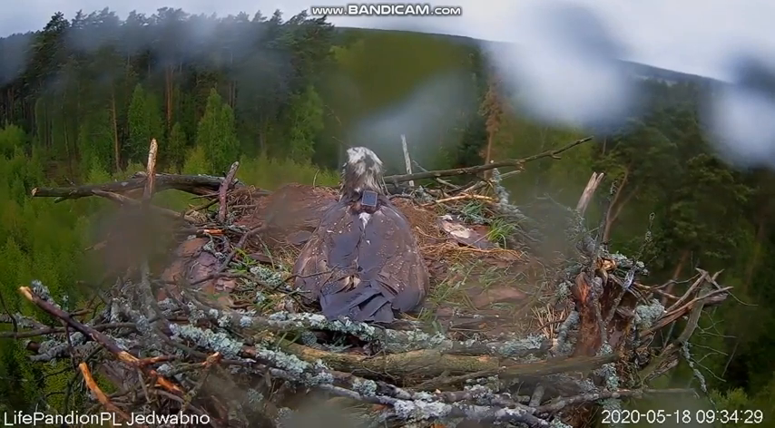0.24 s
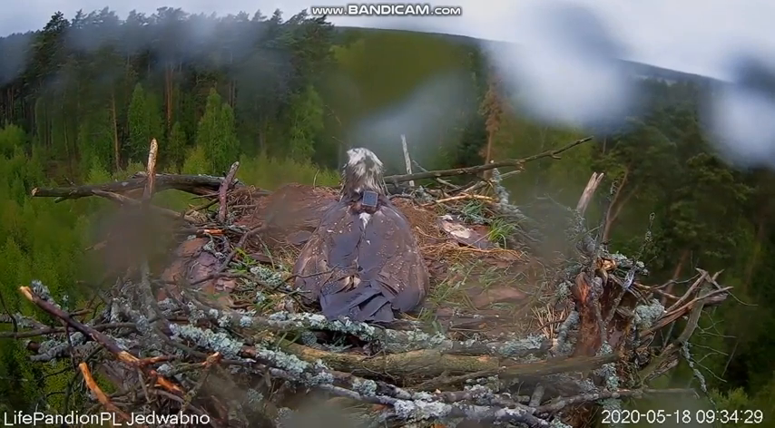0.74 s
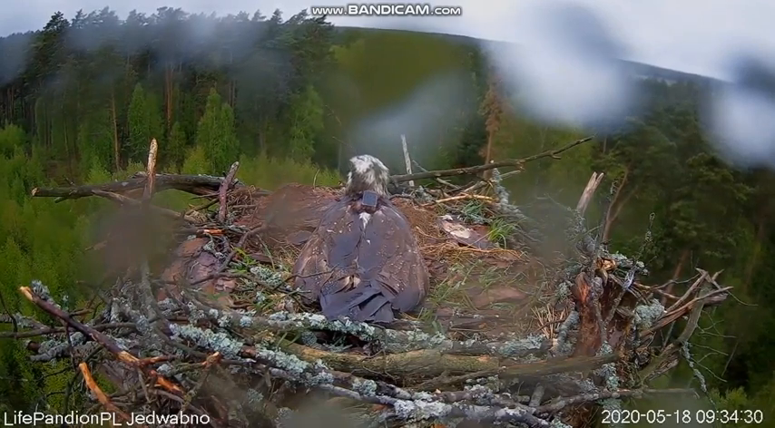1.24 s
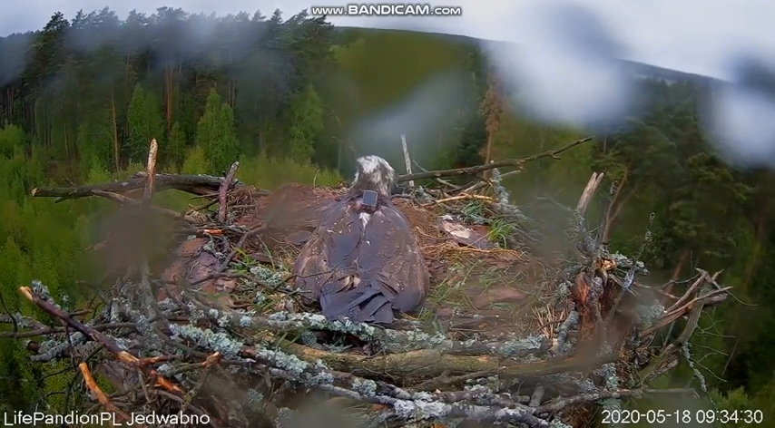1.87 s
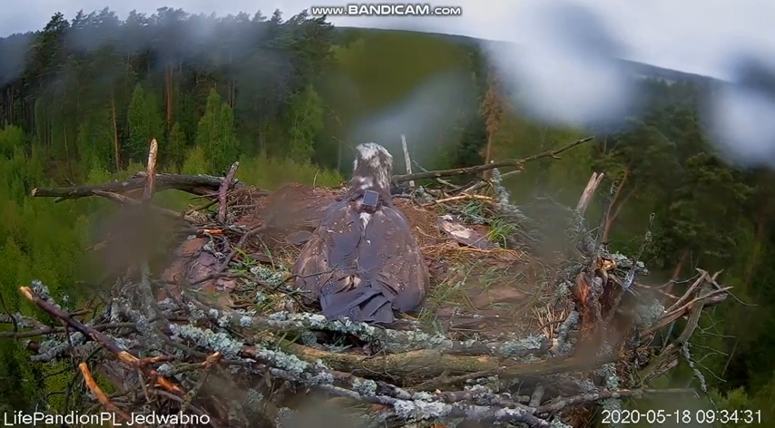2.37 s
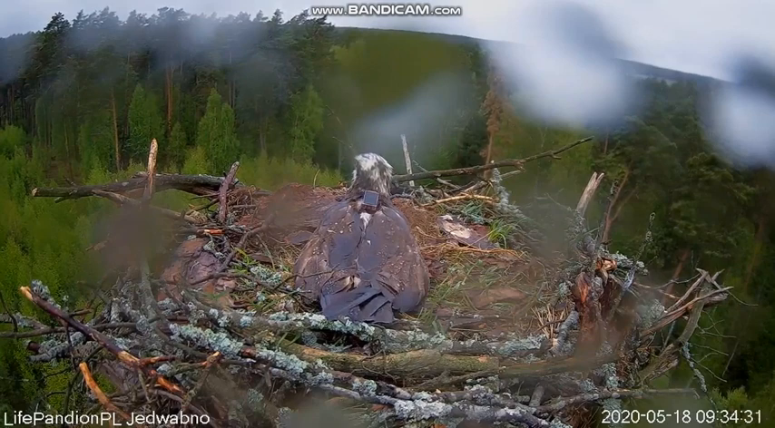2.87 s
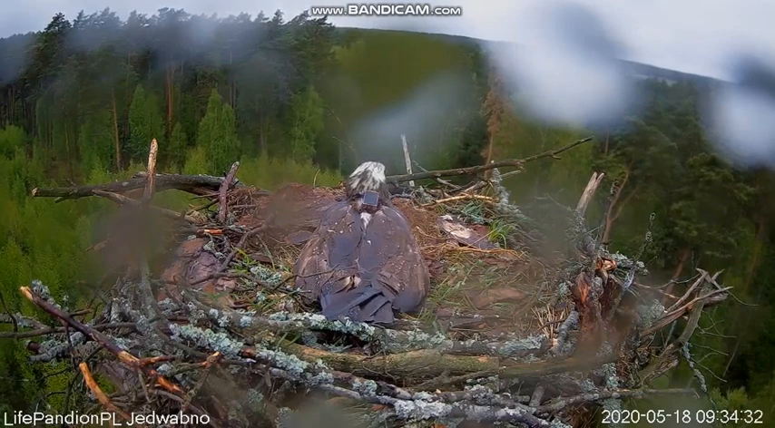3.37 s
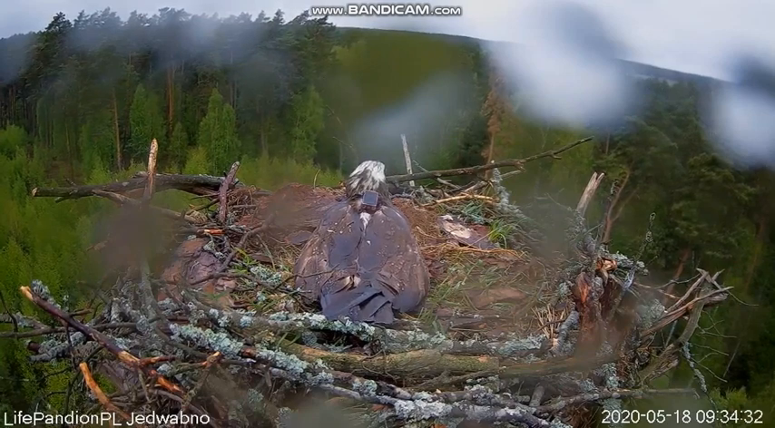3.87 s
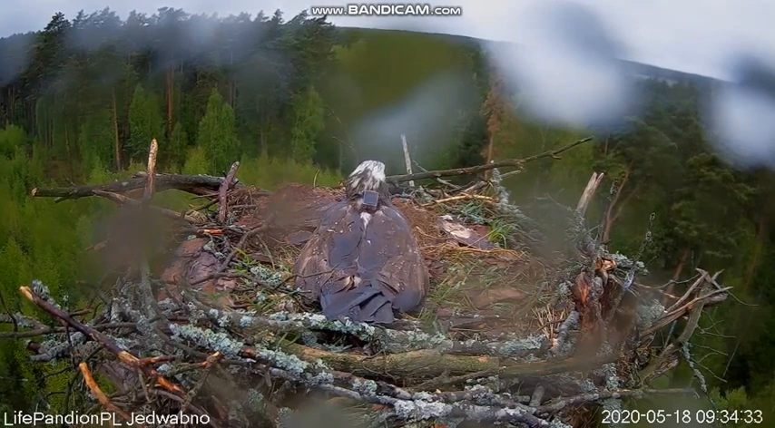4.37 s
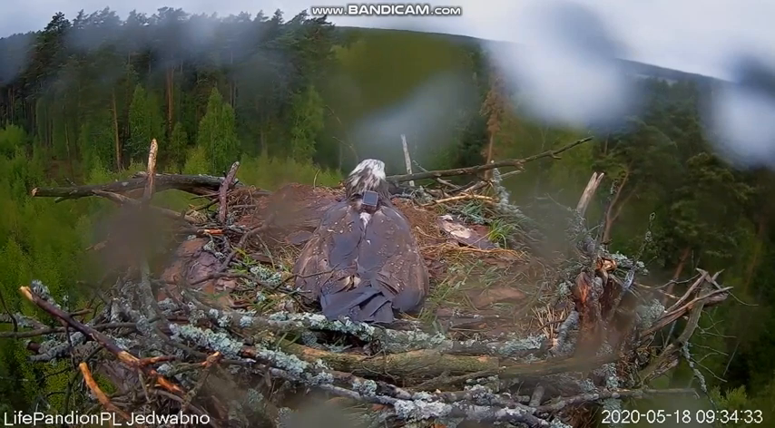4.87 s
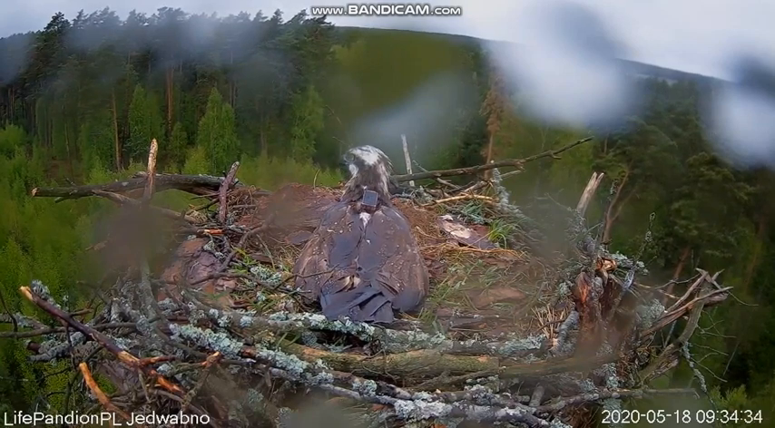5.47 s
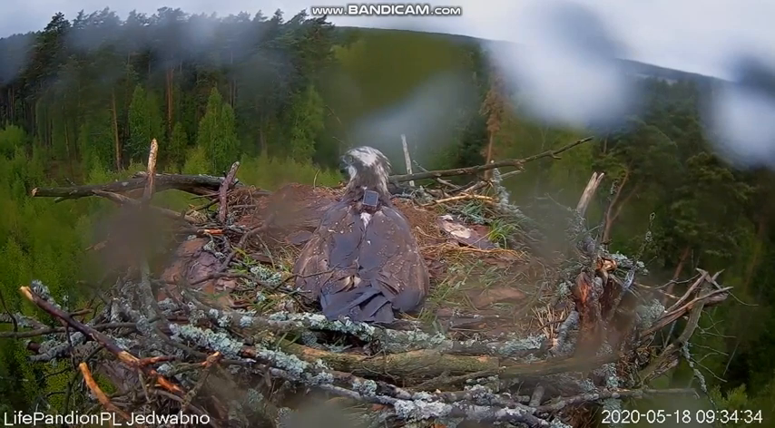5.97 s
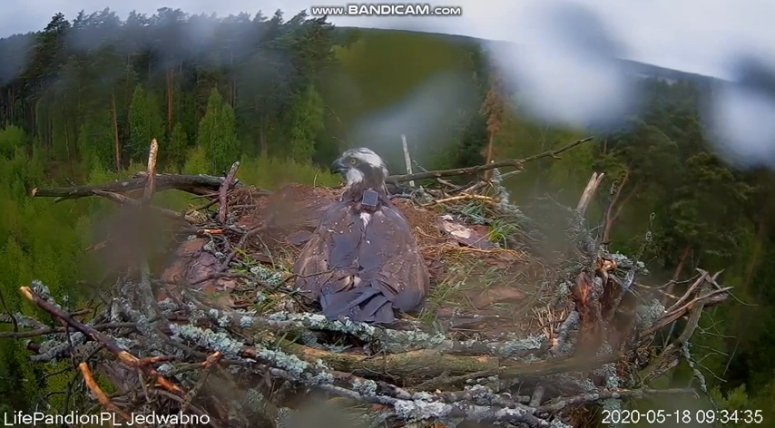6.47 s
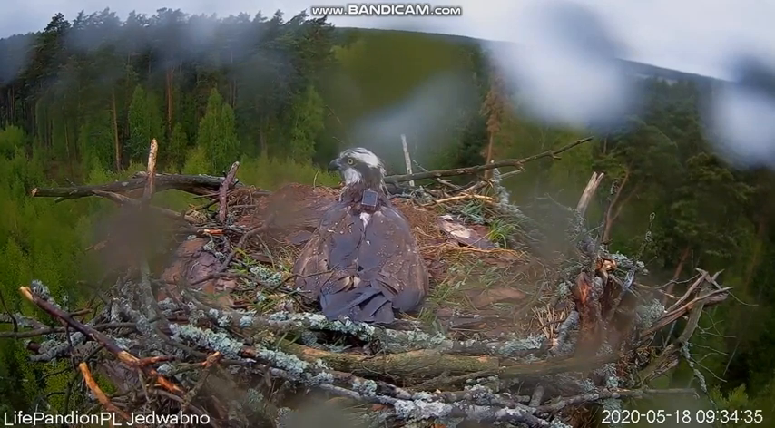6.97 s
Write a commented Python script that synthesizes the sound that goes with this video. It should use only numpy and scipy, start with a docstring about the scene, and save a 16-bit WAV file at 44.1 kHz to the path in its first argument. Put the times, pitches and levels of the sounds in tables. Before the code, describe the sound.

Outdoors on a treetop nest, a nearby osprey gives sharp whistled chirps about five per second: five, then seven, then a louder six, with another starting at the end. Raindrops thud irregularly on the microphone housing, making it rumble low. Light rain hisses softly over the forest, and a small songbird sings very faintly far off.

```python
"""A nest in wet forest, from a camera housing close by: light rain washes over the trees, as shaped noise.
A small songbird sings far off, in pure gliding tones. Raindrops knock on the housing as damped pulses
and set it rumbling, as noise that dies away. Near at hand an osprey gives three runs of whistled chirps
and starts one more; its voice, a tone with overtones and rasp, breaks between registers within the chirps."""
import sys
import numpy as np
from scipy import signal
from scipy.fft import rfft, irfft
from scipy.io import wavfile
from scipy.ndimage import uniform_filter1d

SR = 44100
rng = np.random.default_rng(int(sys.argv[2]) if len(sys.argv) > 2 else 0)


def waveform_to_disk(signal):
    """Save audio, clipped to [-1, 1], as 16-bit WAV at the path in sys.argv[1]."""
    frames = np.transpose(np.atleast_2d(signal))
    scaled = np.clip(frames, -1, 1) * 32767
    samples = np.round(scaled).astype(np.int16)
    wavfile.write(sys.argv[1], SR, samples)


N = 318402

# Steady wash of the forest, spectrum shape only: (f/Hz, relative density/dB per Hz)
FOREST_WASH = [(12, -23.5), (20, 11), (54, -23), (98, -9), (216, -20), (359, -13), (419, -12), (476, -36.5),
               (569, -19.5), (774, -20.5), (2210, -30), (3240, -27), (4290, -30.5), (7340, -34),
               (9000, -55), (11700, -89), (19800, -120)]
WASH_DB = -74  # rms of the part above 100 Hz, before slow drift

# Far songbird, phrase: (start t/s, syllable, pitch factor, peak level/dB before flutter)
SONG_PHRASE = [(0, "dip", 1, -75), (.16, "upslur", .96, -77), (.32, "upslur", 1, -77),
               (.485, "upslur", 1.02, -77), (.64, "downslur", 1, -78), (2.15, "tsee", 1, -80),
               (2.23, "upslur", 1, -81), (2.305, "tsee", 1, -77), (2.445, "tsee", .99, -79),
               (2.595, "tsee", .98, -78), (2.735, "tsee", .97, -81), (2.8, "warble", 1, -80),
               (3.705, "tsee", 1.14, -68), (3.945, "tsee", 1.02, -73), (4.12, "tsee", 1.01, -73),
               (4.29, "hook", 1, -68), (4.47, "hook", .99, -69), (4.642, "flick", 1, -71),
               (4.82, "swoop", 1, -73), (4.99, "swoop", 1.01, -74), (5.135, "flourish", 1, -70),
               (5.335, "downslur", .9, -78)]
# Far songbird, syllables: name -> (length/s, [f/Hz at even steps, before the pitch factor])
SONG_SYLLABLES = {"upslur": (.095, [2300, 2430, 2680, 3120, 3950]),
                  "downslur": (.09, [3700, 3150, 2850, 2720, 2650]),
                  "tsee": (.055, [3750, 3950, 4050, 4060, 4000]),
                  "hook": (.105, [4400, 4380, 4360, 4380, 4400, 4150, 3150]),
                  "swoop": (.105, [3680, 3480, 3300, 3350, 4150, 4800, 4300]),
                  "flick": (.11, [3600, 3550, 3480, 3550, 4450, 4600, 4400]),
                  "dip": (.06, [3500, 3200, 3080, 3150, 3400]),
                  "warble": (.15, [3250, 3380, 3250, 3380, 3280, 3400]),
                  "flourish": (.16, [4100, 3350, 3200, 3300, 3250, 3100, 2850])}

# Clearest drops on the housing: (t/s, thud level/dB, thud f/Hz, snap level/dB), levels before trims
DROP_KNOCKS = [(0.048, -21, 141, -50), (0.15, -28.5, 112, -63), (0.178, -21, 137, -46.5),
               (0.739, -14.5, 240, -38.5), (0.748, -26.5, 247, -34.5), (0.798, -33.5, 244, -51),
               (0.871, -22.5, 180, -48), (0.908, -23, 222, -50), (0.915, -24, 260, -31.5),
               (1.2, -31.5, 109, -63), (1.329, -35.5, 165, -63), (1.41, -28.5, 113, -72),
               (1.484, -30.5, 131, -64), (1.53, -23.5, 119, -55), (1.589, -26.5, 119, -41.5),
               (3.005, -27.5, 125, -72), (3.982, -25.5, 172, -52), (4.013, -23.5, 108, -57),
               (4.02, -23.5, 119, -60), (4.05, -21.5, 159, -38), (4.058, -20.5, 256, -50),
               (4.085, -22, 157, -50), (4.11, -26.5, 163, -64), (4.176, -29.5, 138, -71),
               (4.233, -26, 143, -61), (4.289, -27, 201, -64), (4.395, -33.5, 140, -72),
               (4.45, -31.5, 102, -63), (4.642, -30.5, 149, -64), (4.762, -25, 109, -62),
               (4.778, -26, 152, -60), (4.848, -29.5, 130, -64), (4.947, -24, 176, -49)]
# Flurries of small drops that keep the housing rumbling: (start t/s, length/s, push level/dB)
DROP_FLURRIES = [(.11, .08, -40), (.24, .05, -51), (.69, .42, -51), (1.085, .025, -43), (1.185, .05, -45),
                 (1.31, .08, -48), (1.39, .21, -39), (1.61, .38, -60), (2.82, .16, -57), (2.99, .06, -46),
                 (3.91, .06, -49), (3.97, .15, -35), (4.12, .18, -41), (4.39, .07, -44), (4.635, .06, -42),
                 (4.74, .13, -43), (5.575, .045, -42), (5.65, .11, -52), (5.81, .05, -47), (6.12, .2, -59),
                 (6.25, .05, -51), (7.17, .05, -59)]
SWAY_DECAY_S, RUMBLE_DECAY_S = .04, .007  # time constants of power

# Osprey, arches of effort; levels are bases that the arch and the register then bend:
# (start t/s, flip up t/s, drop back t/s, end t/s, whistle crest f/Hz, pitch sag at the ends 0-1,
#  whistle level/dB, low register level/dB, rasp level/dB, added overtones/dB, added subharmonics/dB)
CHIRP_ARCHES = [(1.053, 1.091, 1.161, 1.161, 2760, .18, -44, -50, -51, 5, 12),
                (1.250, 1.273, 1.344, 1.358, 2950, .22, -38.5, -38, -51, -5, -4),
                (1.435, 1.458, 1.541, 1.550, 2730, .22, -40.5, -35, -47, -9, 4),
                (1.632, 1.647, 1.738, 1.747, 2700, .22, -35, -34, -44, -6, 4),
                (1.831, 1.853, 1.934, 1.946, 2880, .24, -40, -34, -48, -6, 3),
                (2.998, 3.045, 3.097, 3.120, 2880, .19, -35.5, -35, -49, 2, 5),
                (3.189, 3.214, 3.300, 3.314, 3180, .26, -34, -35, -48, 1, 0),
                (3.385, 3.408, 3.494, 3.510, 3200, .26, -33, -34, -46, 1, 1),
                (3.579, 3.614, 3.690, 3.704, 3220, .25, -32, -34, -46, 1, 1),
                (3.780, 3.805, 3.884, 3.901, 3190, .26, -32, -35, -48, 1, 4),
                (3.980, 4.007, 4.088, 4.104, 3170, .25, -33, -34, -47, 1, 0),
                (4.182, 4.214, 4.291, 4.307, 3060, .21, -33, -35, -46, 0, -1),
                (5.443, 5.494, 5.549, 5.549, 2490, .13, -44, -50, -57, 12, 8),
                (5.633, 5.657, 5.727, 5.743, 2770, .29, -33, -38, -48, -1, -1),
                (5.826, 5.850, 5.931, 5.947, 2800, .22, -31, -37, -46, -1, -4),
                (6.022, 6.045, 6.134, 6.145, 2900, .24, -28, -35, -46, -1, -3),
                (6.234, 6.259, 6.343, 6.349, 2890, .26, -25.5, -34, -44, -1, -3),
                (6.496, 6.508, 6.609, 6.616, 2830, .27, -27, -50, -43, 3, -6),
                (7.183, 7.198, 7.290, 7.290, 2580, .17, -31, -50, -47, 7, 1)]
# Osprey, leaps to the top register: (start t/s, end t/s, crest f/Hz, base level/dB)
TOP_LEAPS = [(1.486, 1.525, 3400, -43), (1.668, 1.724, 3400, -41), (1.871, 1.918, 3580, -42),
             (3.230, 3.263, 3700, -41), (3.424, 3.469, 3790, -39), (3.635, 3.672, 3820, -38),
             (3.829, 3.845, 3800, -39), (4.033, 4.060, 3790, -38), (6.080, 6.114, 3430, -35),
             (6.559, 6.580, 3380, -36)]
# Registers of the voice, all with the same columns:
# (share of the pitch sag, tilt of pitch down towards the end 0-1, level change at the ends/dB,
#  then bases relative to the tone: 2nd harmonic/dB, 3rd harmonic/dB, half-pitch/dB, quarter-pitch/dB)
LOW_REGISTER = (1.08, .035, -2, -14.5, -36, -29, -37)
MAIN_REGISTER = (1, .005, -6, -31, -46, -32, -24)
TOP_REGISTER = (.6, .02, -6, -21, -40, -38, -33)
# Opening of a rested voice, on the whistle's own pitch
THIN_REGISTER = (1, -.01, -9, -21, -30, -30, -33)
# Resonances of throat and beak that colour the rasp: (f/Hz, width/Hz, level/dB); FACING adds to the last
THROAT_RESONANCES = [(2060, 350, 1), (2638, 210, 1.5), (3740, 630, -8), (7260, 730, -18)]
# Turning of the head, read in between: (t/s, added gain of the highest beak resonance/dB)
HEAD_FACING = [(1.5, 3.5), (3.6, -2), (6.0, 9)]

LOW_RATIO, CLOSING_DB = .775, -4  # low register's pitch against the whistle; weaker on the way down
BREAK_DIP_DB, BREAK_DIP_S = -6, .002  # the tone falters on either side of a flip
EDGE_OVERTONES_DB, EDGE_RASP_DB = 8, -10  # away from the crest: reedier, less hoarse
REST_S = .4  # a longer silence than this leaves the voice rested
THIN_DB, THIN_RASP_DB, LATE_CREST = -3, -8, 1.15  # rested: thin, cleaner opening and a later crest
ATTACK_S, RELEASE_S = .007, .011
LOW_SWELL_S, OPENING_RASP_DB = .015, -2  # low register speaks slowly; full hoarseness comes with the flip

EDGE_HZ = 8800  # upper edge of the camera's sound


def gain_of(db):
    """Decibels to amplitude."""
    return 10 ** (np.asarray(db) / 20)


def evened(x):
    """Scales to rms 1."""
    return x / np.sqrt(np.mean(x ** 2) + 1e-20)


def spectrum_at(points, hz):
    """Reads a spectrum between its points on a log-frequency axis."""
    f, value = np.transpose(points)
    return np.interp(np.log(hz + 1), np.log(f + 1), value)


def add(mix, s, sound):
    """Mixes a sound in at time s, cut off where the mix ends."""
    part = mix[max(round(s * SR), 0):][:len(sound)]
    part += sound[:len(part)]


def noise(gain, size=N):
    """Noise of rms 1 whose white spectrum is weighted by gain(Hz)."""
    spectrum = rfft(rng.standard_normal(size)) * gain(np.fft.rfftfreq(size, 1 / SR))
    return evened(irfft(spectrum, size))


def band(low_hz, high_hz, order=3):
    """A band with soft shoulders, as gain(Hz)."""
    def gain(f):
        low_side = 1 + (low_hz / (f + 1e-3)) ** (2 * order)
        high_side = 1 + (f / high_hz) ** (2 * order)
        return 1 / np.sqrt(low_side * high_side)
    return gain


def ramp(x):
    """Rises smoothly from 0 to 1 as x does."""
    return np.sin(np.pi / 2 * np.clip(x, 0, 1)) ** 2


def wash(drone_db=-78):
    """Light, steady rain on the trees as shaped noise, with a faint low drone of narrow-band noise."""
    hiss = noise(lambda f: gain_of(spectrum_at(FOREST_WASH, f)))
    # the deep bass is left out when the level is set
    audible = irfft(rfft(hiss) * (np.fft.rfftfreq(N, 1 / SR) > 100), N)
    drift_db = .4 * noise(band(.5, 12))
    hiss *= gain_of(WASH_DB + drift_db) / audible.std()
    return hiss + gain_of(drone_db) * noise(band(405, 455, order=8))


def songbird(flutter_db=2.5):
    """Thin, pure glides whose level flutters on their long way through the trees."""
    song = np.zeros(N)
    for start, name, factor, db in SONG_PHRASE:
        length, pitches = SONG_SYLLABLES[name]
        progress = np.linspace(0, 1, round(length * SR))
        glide = np.interp(progress, np.linspace(0, 1, len(pitches)), pitches)
        hz = factor * uniform_filter1d(glide, size=400)
        tone = np.sin(2 * np.pi * np.cumsum(hz) / SR)
        add(song, start, gain_of(db) * tone * signal.windows.tukey(len(progress), .4))
    return song * gain_of(flutter_db * noise(band(15, 120)))


def housing(sway_db=-8.5, rumble_db=-5.5, knock_db=-17, contact_s=.012, rest_db=-67, lumpy_db=3):
    """Flurries and knocks shake the housing: its rumble dies quickly, the sway of its mount slowly."""
    contacts = [(s - contact_s, 2 * contact_s, db + knock_db) for s, db, _, _ in DROP_KNOCKS]
    push = np.zeros(N)  # power
    for s, length, db in DROP_FLURRIES + contacts:
        add(push, s, np.full(round(length * SR), gain_of(db) ** 2))

    def ringing(decay_s):
        """Amplitude of a motion whose power leaks away exponentially."""
        leak = 1 / (decay_s * SR)
        return np.sqrt(signal.lfilter([leak], [1, leak - 1], push + 1e-18))

    sway_level = gain_of(sway_db) * ringing(SWAY_DECAY_S) + gain_of(rest_db)
    sway = sway_level * noise(band(20, 56, order=5))
    lumps = gain_of(lumpy_db * noise(band(10, 60)))
    rumble_level = gain_of(rumble_db) * ringing(RUMBLE_DECAY_S) * lumps
    return sway + rumble_level * noise(band(62, 175, order=4))


def knocks(blow_db=-1, cycles=0.46, snap_db=-2, snap_hz=560, snap_cycles=0.89, tick_db=-30, tick_s=.003):
    """Each knock is a heavily damped thud of about one swing, with a quicker snap and a faint tick of water."""
    out = np.zeros(N)
    t = np.arange(-900, 1400) / SR  # 0 at the middle of the blow

    def pulse(hz, width):
        """A few swings at most, of random phase, swelling and fading around t = 0."""
        swing = np.sin(2 * np.pi * (t * hz + rng.random()))
        return swing / np.cosh(np.clip(2 * t * hz / width, -40, 40))

    for s, db, hz, sharp_db in DROP_KNOCKS:
        thud = gain_of(db + blow_db) * pulse(hz, cycles)
        snap = gain_of(sharp_db + snap_db) * pulse(snap_hz, snap_cycles)
        tick_level = gain_of((db + sharp_db) / 2 + tick_db) * np.exp(-abs(t) / tick_s)
        tick = tick_level * noise(band(270, 5000, order=1), size=len(t))
        add(out, s + t[0], (thud + snap + tick) * signal.windows.tukey(len(t), .3))
    return out


def whistle(hz, register, reedy_db, split_db, slip_depth, jitter=0.0015, shimmer=0.04, fourth_db=-13,
            sub_db=2, wander=0.23):
    """The voice in one register: a tone on the pitch curve hz, with overtones and period-doubling lines."""
    second_db, third_db, half_db, quarter_db = register[3:]

    def draw(gain):
        return noise(gain, size=8192)[:len(hz)]

    phase = 2 * np.pi * np.cumsum(hz * (1 + jitter * draw(band(60, 660)))) / SR
    # the rougher the voice, the more single swings slip, which breaks up the overtones
    slip = slip_depth * draw(band(70, 700))
    harmonics_db = [second_db, third_db, third_db + fourth_db]
    overtones = sum(gain_of(db + reedy_db) * np.sin(k * (phase + slip))
                    for k, db in enumerate(harmonics_db, 2))
    # the membranes repeat only every second or fourth swing, which puts lines between the harmonics
    quarter_phase = phase / 4 + wander * draw(band(10, 120))
    quarter = gain_of(quarter_db) * np.cos(quarter_phase)
    half = gain_of(half_db) * np.cos(2 * quarter_phase)
    doubling = np.sqrt(2) * gain_of(sub_db + split_db) * (quarter + half)
    unrest = doubling + shimmer * draw(band(46, 600))
    return np.sqrt(2) * (np.sin(phase) * (1 + unrest) + overtones * (1 + 2 * unrest))


def throat(f, s):
    """Gain of the throat's resonances at time s, with steep valleys between them."""
    peaks = [gain_of(db) / (1 + (2 * (f - hz) / width) ** 2) for hz, width, db in THROAT_RESONANCES]
    facing = gain_of(np.interp(s, *np.transpose(HEAD_FACING)))
    return sum(peaks[:-1]) + peaks[-1] * facing


def rasp(s, hz, size, grain=.4, hug_db=4, hug_hz=600):
    """Chaotic flutter comes in tiny bursts, is boosted around the tone and rings in the throat."""
    def colour(f):
        near_tone = gain_of(hug_db * np.exp(-((f - hz) / hug_hz) ** 2))
        return throat(f, s) * near_tone * band(900, 9000)(f)

    bursts = np.exp(grain * noise(band(40, 350), size=8192))
    return evened((noise(colour, size=8192) * bursts)[:size])


def register_steps(row, rested):
    """The steps of the climb and return: (from s, register, crest pitch Hz, base level dB)."""
    start, up, down, end, crest_hz, _, db, low_db = row[:8]
    low_hz = LOW_RATIO * crest_hz
    if rested:
        steps = [(start, THIN_REGISTER, crest_hz, db + THIN_DB)]
    else:
        steps = [(start, LOW_REGISTER, low_hz, low_db)]
    steps.append((up, MAIN_REGISTER, crest_hz, db))
    for leap, back, top_hz, top_db in TOP_LEAPS:
        if start < leap < end:
            steps += [(leap, TOP_REGISTER, top_hz, top_db), (back, MAIN_REGISTER, crest_hz, db)]
    return steps + [(down, LOW_REGISTER, low_hz, low_db + CLOSING_DB)]


def chirp(row, rested, break_s=.003, slip_per_rasp=.5, most_slip=.11):
    """One arch of effort bends pitch and level while the voice moves through its registers."""
    start, up, _, end, crest_hz, sag, _, _, rasp_db, reedy_db, split_db = row
    t = np.arange(start, end, 1 / SR)
    x = 2 * np.linspace(0, 1, len(t)) ** (LATE_CREST if rested else 1) - 1  # -1 to 1, 0 at the crest
    opening_db = (THIN_RASP_DB if rested else OPENING_RASP_DB) * ramp((up - t) / break_s)
    hoarse = gain_of(rasp_db + EDGE_RASP_DB * x ** 2 + opening_db)
    voice = hoarse * rasp(start, crest_hz, len(t))
    steps = register_steps(row, rested)
    step_ends = [step[0] for step in steps[1:]] + [end]
    for (begin, register, hz, level_db), until in zip(steps, step_ends):
        bend, tilt, ends_db = register[:3]
        inside_s = np.minimum(t - begin, until - t)  # negative outside the step
        falter_db = BREAK_DIP_DB * np.exp(-abs(inside_s) / BREAK_DIP_S)
        slip = np.minimum(slip_per_rasp * hoarse / gain_of(level_db), most_slip)
        pitch = hz * (1 - sag * bend * x ** 2 - tilt * x ** 3)
        tone = whistle(pitch, register, reedy_db + EDGE_OVERTONES_DB * x ** 2, split_db, slip)
        speaks = ramp(inside_s / break_s + .5)  # neighbouring steps cross-fade
        if register is LOW_REGISTER:
            speaks = speaks * ramp((t - start) / LOW_SWELL_S)
        voice += tone * speaks * gain_of(level_db + ends_db * x ** 2 + falter_db)
    attack = np.sqrt(np.minimum((t - start) / ATTACK_S, 1))
    release = np.minimum((end - t) / RELEASE_S, 1)
    return start, voice * attack * release


def osprey(air_db=-65, ring_db=-24, ring_hz=3750, ring_width_hz=70):
    """The chirps in turn; air rustles with the voice, and the windpipe rings briefly after it."""
    voice = np.zeros(N)
    last_end = -np.inf
    for row in CHIRP_ARCHES:
        add(voice, *chirp(row, rested=row[0] - last_end > REST_S))
        last_end = row[3]
    flow = np.sqrt(abs(uniform_filter1d(abs(voice), size=480)))
    air = gain_of(air_db) * flow / flow.max() * noise(band(500, 3300))
    windpipe = signal.lfilter(*signal.iirpeak(ring_hz, ring_hz / ring_width_hz, fs=SR), voice)
    return voice + air + gain_of(ring_db) * windpipe


def echoes(x, t60, delay_s):
    """Scattered reflections, as noise that builds up over delay_s and dies away by 60 dB in t60."""
    t = np.arange(SR) / SR
    tail = rng.standard_normal(SR) * gain_of(-60 * t / t60) * (1 - np.exp(-t / delay_s))
    return signal.fftconvolve(x, tail / np.linalg.norm(tail))[:N]


def scene():
    """The near bird is almost dry, with quick reflections off the nest; the far one is wet."""
    near, far = osprey(), songbird()
    nest = gain_of(-21.5) * echoes(near, t60=0.059, delay_s=0.0018)
    trees = echoes(gain_of(-43.5) * near + gain_of(-9) * far, t60=0.46, delay_s=0.0079)
    return (near + far + nest + trees + knocks() + housing() + wash())[None]


def record(dry, droop_hz=8100):
    """The camera's narrow band: the treble droops, then ends steeply."""
    soft = signal.sosfilt(signal.butter(8, droop_hz, fs=SR, output="sos"), dry)
    edge = signal.firwin(301, EDGE_HZ, window=("kaiser", 9), fs=SR)
    return signal.oaconvolve(soft, edge[None], "same")


dry = scene()
out = record(dry)
waveform_to_disk(out)
```